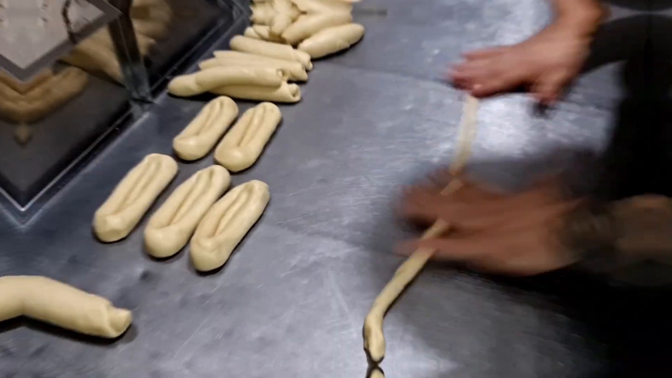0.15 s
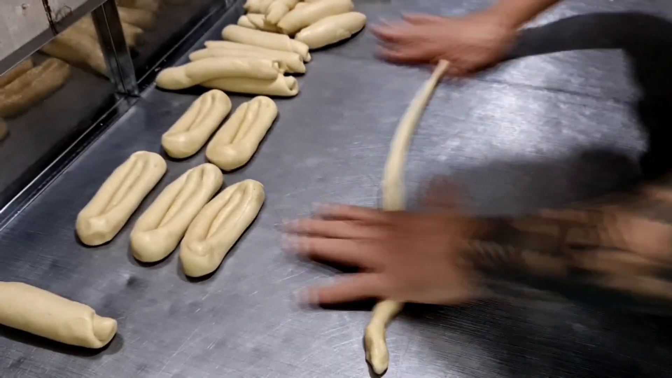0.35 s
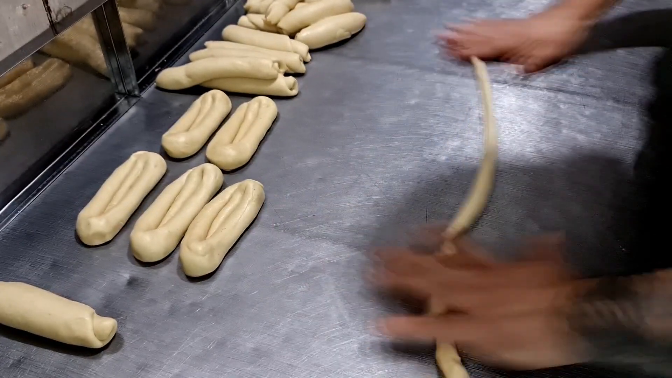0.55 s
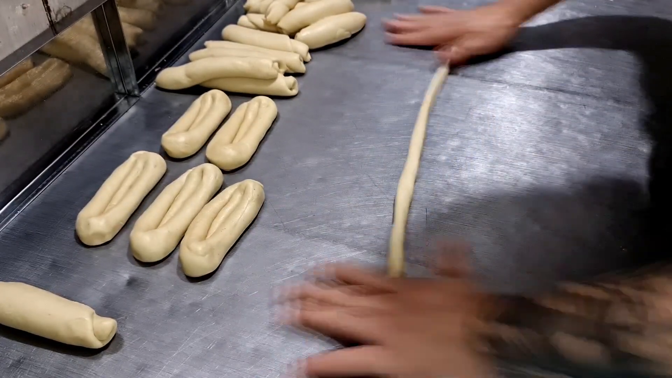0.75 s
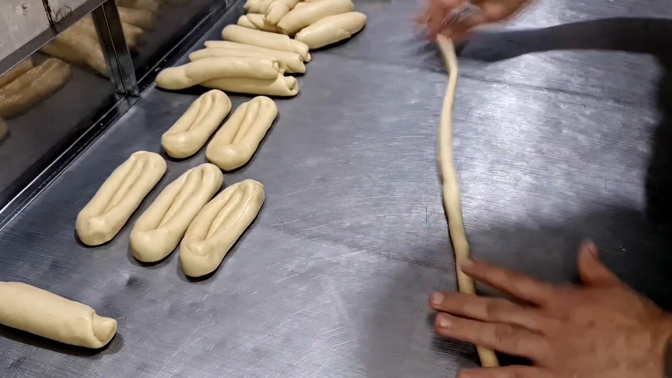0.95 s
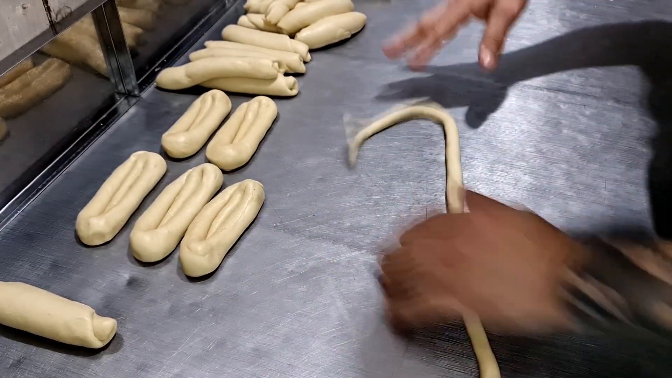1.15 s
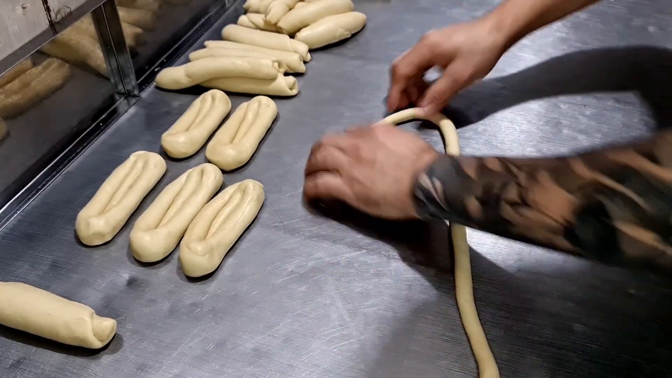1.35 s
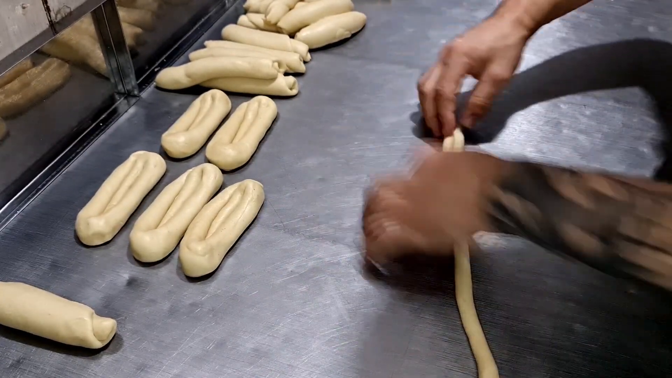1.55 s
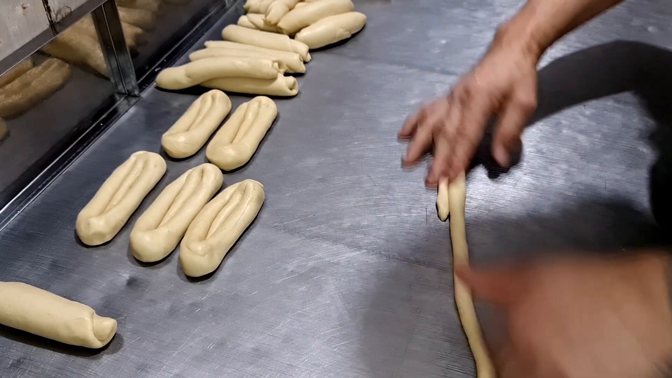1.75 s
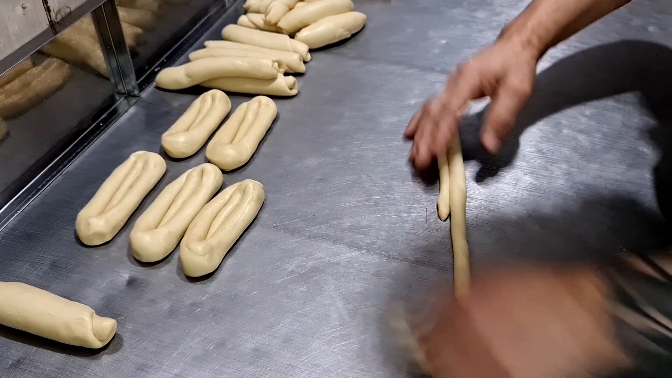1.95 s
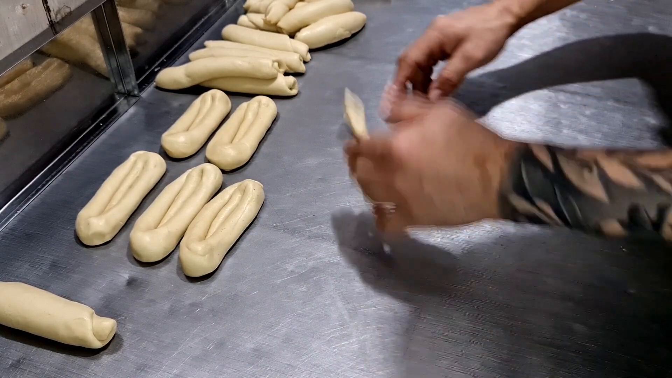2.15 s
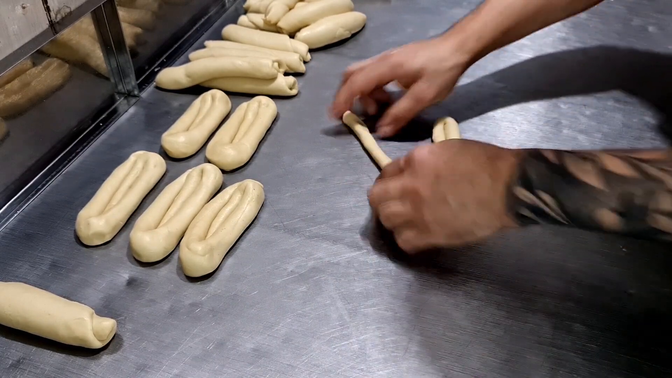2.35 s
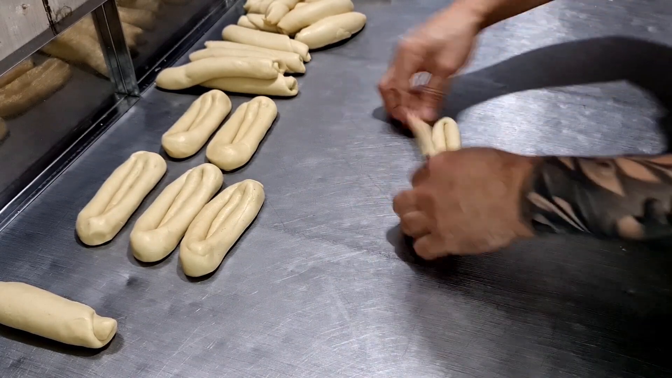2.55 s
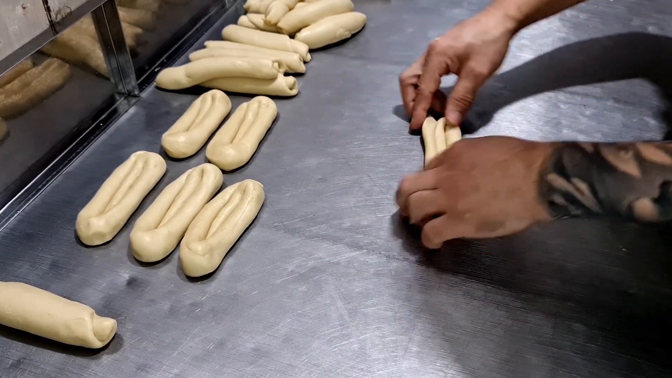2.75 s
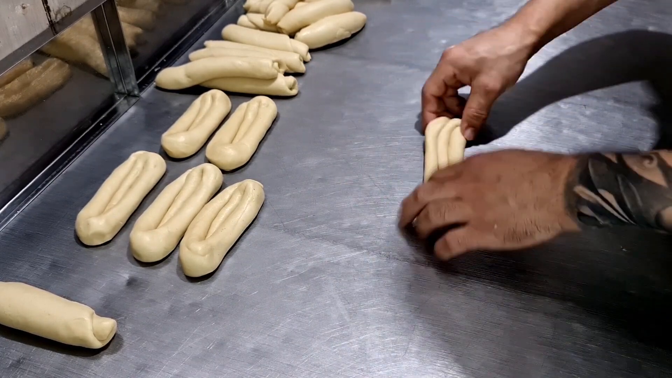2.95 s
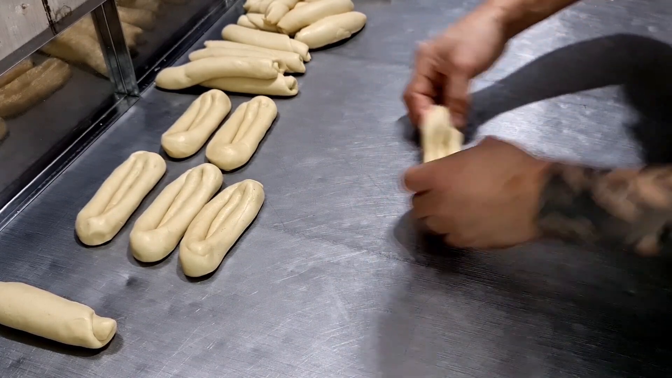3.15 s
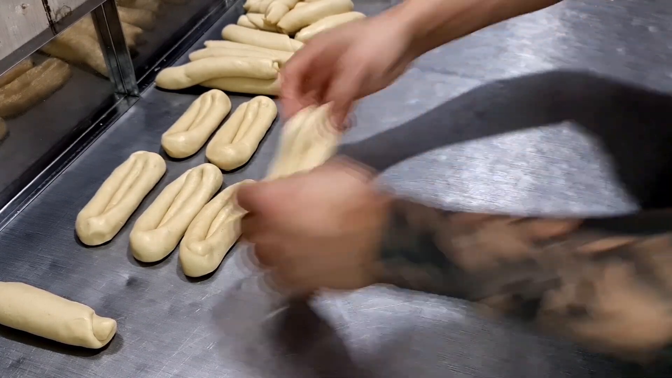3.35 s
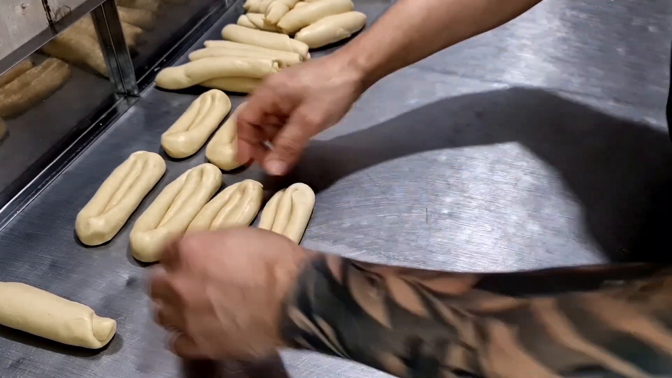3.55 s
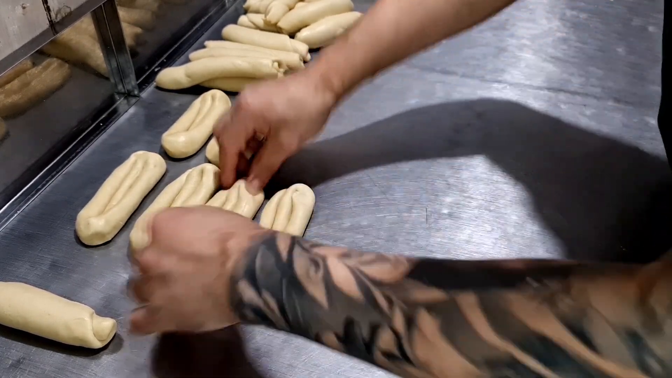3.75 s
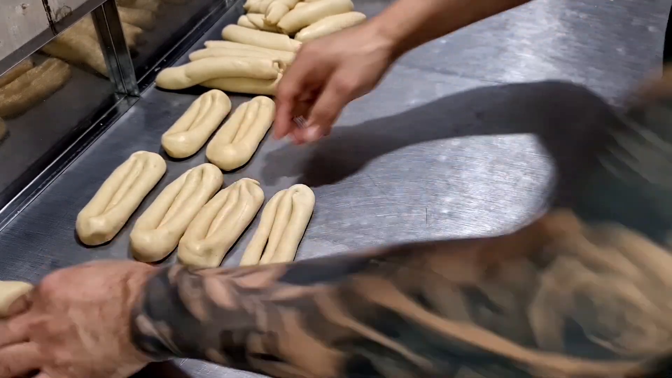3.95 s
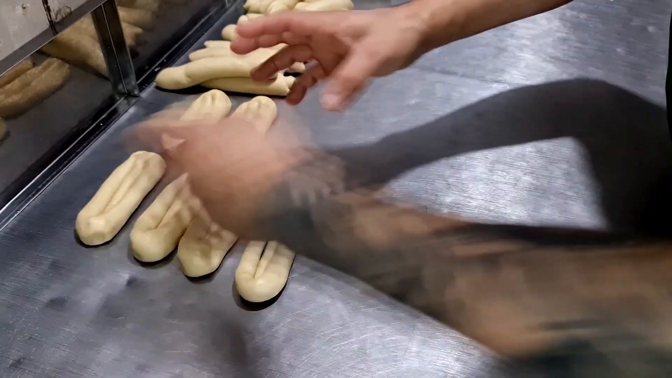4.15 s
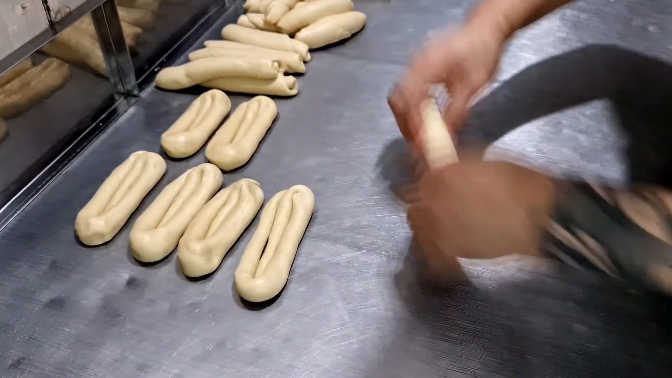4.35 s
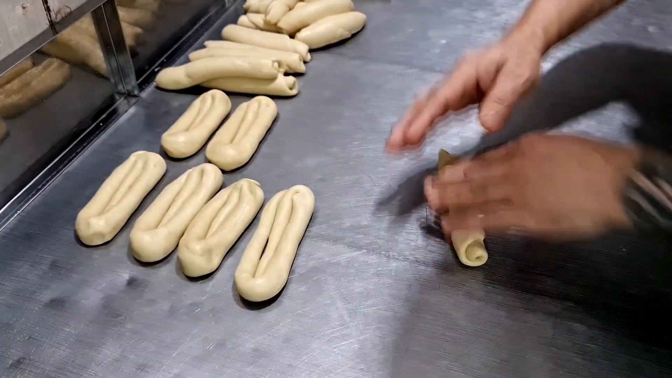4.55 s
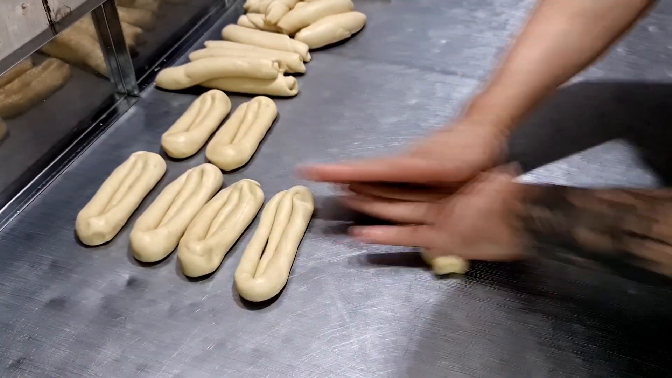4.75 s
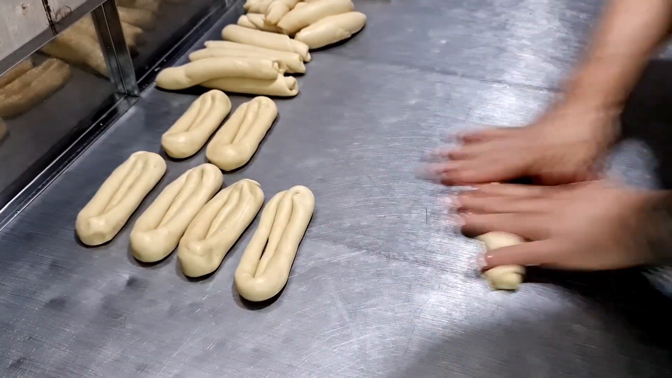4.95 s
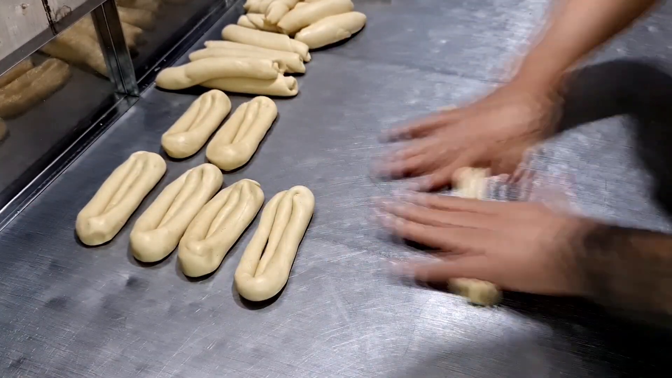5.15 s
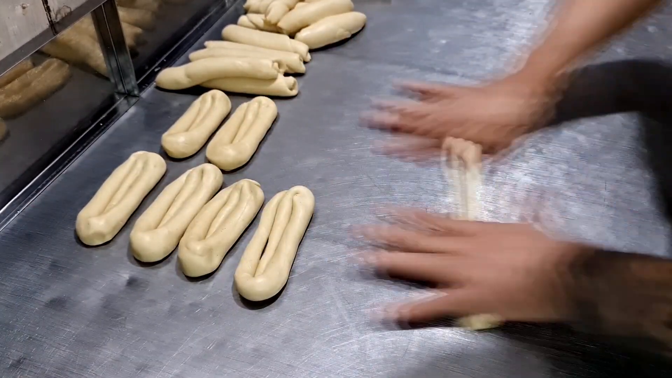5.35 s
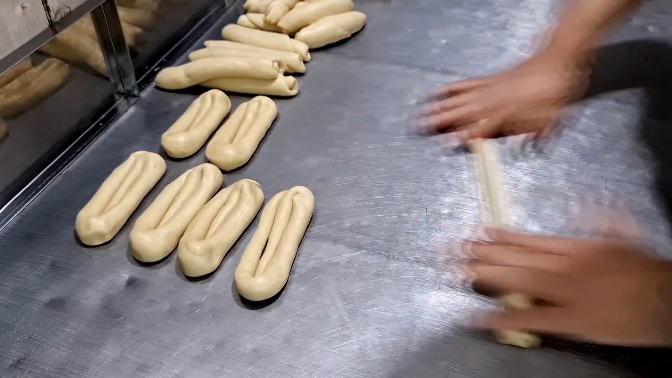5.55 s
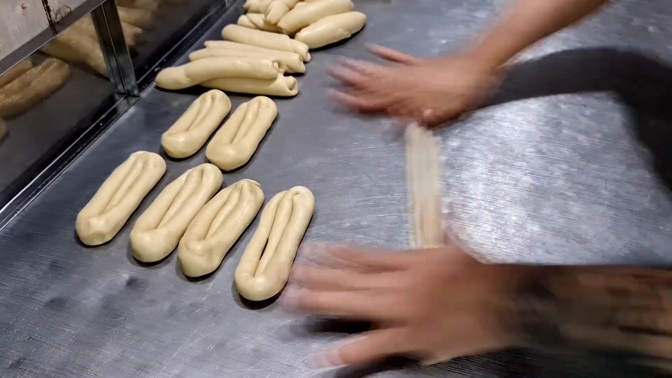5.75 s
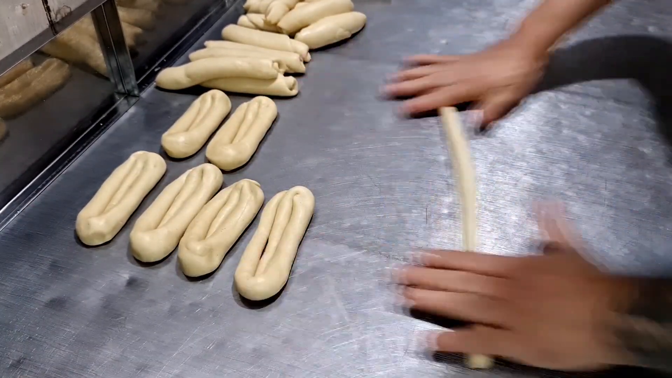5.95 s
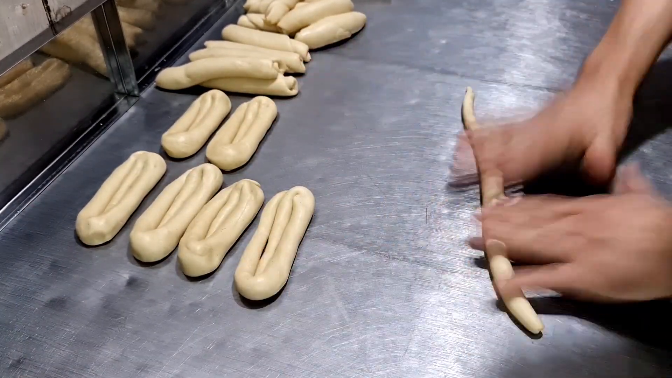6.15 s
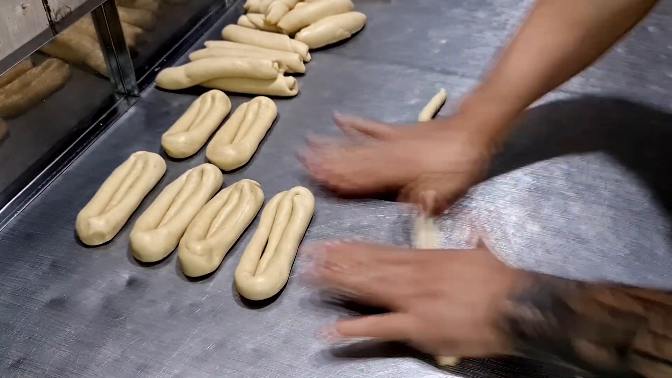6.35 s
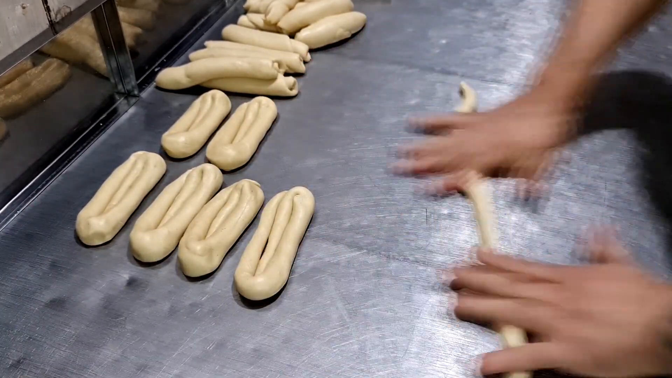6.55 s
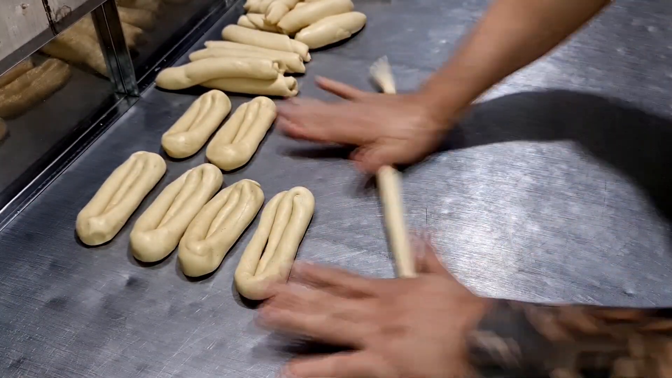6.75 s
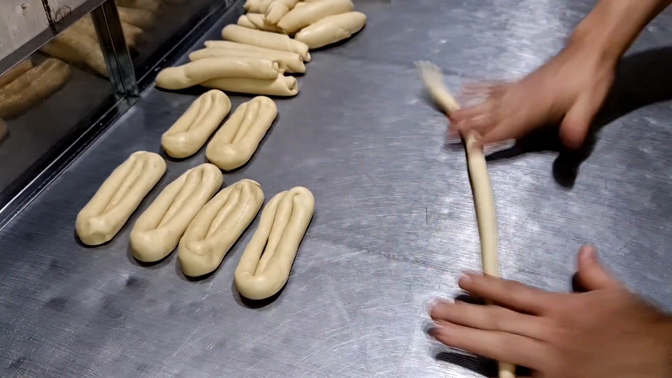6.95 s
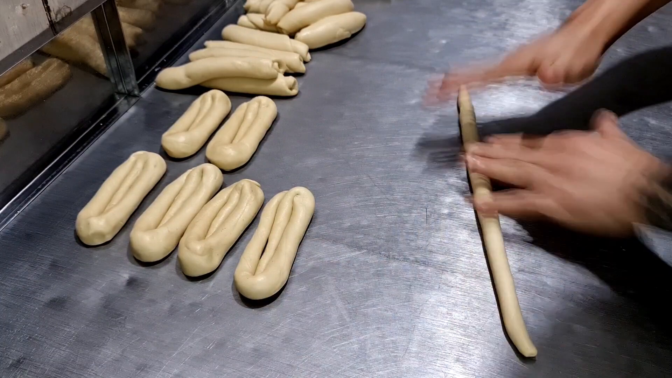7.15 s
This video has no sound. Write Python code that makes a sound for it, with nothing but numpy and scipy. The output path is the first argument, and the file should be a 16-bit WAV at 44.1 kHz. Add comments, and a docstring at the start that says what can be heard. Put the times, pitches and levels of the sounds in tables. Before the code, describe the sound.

Hands roll dough ropes on a hollow steel bench with soft quick rubbing, broken by dull knocks and one loud slap, over a cooler's hum.

```python
"""A baker rolls ropes of dough under both palms on a steel bench, and dough or a flat palm slaps down.
Each blow rings the hollow bench top: a low boom, a knock and a clang, with a smack of squeezed air.
Rolling patters softly on the same bench; dough and skin hiss over the steel as noise with tiny catches.
A small hard kitchen adds fading echoes, and a cooler rushes and hums in the background."""
import sys
import numpy as np
from scipy import signal
from scipy.fft import rfft, irfft, next_fast_len
from scipy.io import wavfile
from scipy.ndimage import map_coordinates

SR = 44100
rng = np.random.default_rng(int(sys.argv[2]) if len(sys.argv) > 2 else 0)


def wav_out(sig):
    """Save sig, one row per channel (or a flat mono array), as 16-bit PCM at SR to the path in sys.argv[1]."""
    wavfile.write(sys.argv[1], SR, np.round(np.clip(np.atleast_2d(sig).T, -1, 1) * 32767).astype(np.int16))


N = 321354
TIME = np.arange(N) / SR  # the whole scene [s]
AFTER = np.arange(SR * 3 // 5) / SR  # time since one blow [s]

# Dough or a flat palm slaps the steel; all levels are relative, and each sound has a further overall level:
# (time [s], knock [dB], boom over the knock [dB], clang over its usual share [dB],
#  smack [dB], crack over the smack [dB])
SLAP_EVENTS = [(1.250, -23.5, -31, 2.5, -40, -6), (1.271, -26, -4.5, 3, -36, -24),
               (2.266, -24, -3, -8.5, -35, -13), (2.274, -34, -11, 8.5, -37, -18),
               (2.665, -37, 8, -12, -42.5, -12.5), (3.543, -20.5, 0, -3, -29, -4),
               (4.493, -38, 6, -8, -30, -19), (4.504, -18.5, 13, 10.5, -18.5, -19.5),
               (4.737, -57, 17, 1, -51, -20), (6.304, -49, 19, 6, -45, -4.5), (6.712, -40, 4, 10, -56, -4),
               (7.1, -43, 1.5, 10, -48.5, -22)]
# The palms roll the rope out and back, about five strokes a second; levels are relative:
# (fastest moment [s], rub [dB], bare skin over the rub [dB], weight on the bench [dB])
ROLL_STROKES = [(0.12, -53.5, -15, -47.5), (0.343, -57.5, -17, -51), (0.524, -53.5, -13.5, -48),
                (0.73, -54.5, -14, -51.5), (0.897, -57, -5.5, -53.5), (4.743, -59.5, -13, -58),
                (4.898, -60, -8, -55), (5.088, -57.5, -15, -51), (5.244, -54.5, -15, -51.5),
                (5.45, -55, -14, -46.5), (5.606, -50.5, -18, -50.5), (5.82, -53, -11.5, -49),
                (5.996, -53, -13, -46), (6.32, -56.5, -17.5, -55.5), (6.5, -55.5, -16, -48.5),
                (6.702, -55.5, -6.5, -56), (6.897, -54.5, -13.5, -53), (7.27, -65, -36, -78)]
# Frequency ranges of the bench's boom, knock, clang and plate, in that order: (from [Hz], to [Hz])
BENCH_REGISTERS = [(0, 115), (115, 290), (290, 440), (440, 1000)]


def amp(db):
    """Turn decibels into a gain."""
    return 10 ** (np.asarray(db) / 20)


def unit(x):
    """Scale a sound to rms 1."""
    return x / np.sqrt(np.mean(x ** 2) + 1e-20)


def unit_attack(x, size=2646):
    """Scale a sound to rms 1 over its first 60 ms."""
    return x / np.sqrt(np.mean(x[..., :size] ** 2) + 1e-20)


def along(points, hz):
    """Read a curve of (frequency [Hz], value) points on a log frequency axis."""
    f, v = np.transpose(points)
    return np.interp(np.log(hz + 1), np.log(f + 1), v)


def wobble(rate):
    """Draw a smooth random curve through `rate` random points a second."""
    knots = rng.standard_normal(int(N * rate / SR) + 4)
    return map_coordinates(knots, [TIME * rate])


def filtered(x, response):
    """Make each frequency of x louder or softer by the gain that response gives it."""
    n = x.shape[-1]
    m = next_fast_len(n + 8192)
    hz = np.fft.rfftfreq(m, 1 / SR)
    return irfft(rfft(x, m) * response(hz), m)[..., :n]


def half_angle(hz):
    """Half the phase between the two ears that gives their likeness at each frequency."""
    # How alike left and right are: (frequency [Hz], likeness from -1 to 1)
    likeness = [(100, 0.94), (200, 0.89), (380, 0.39), (700, -0.35), (1300, -0.5), (2400, -0.12),
                (8000, -0.038)]
    return np.arccos(np.clip(along(likeness, hz), -1, 1)) / 2


def noise(spectrum, size, grain=1):
    """Coloured stereo noise of rms 1, nearly the same in both ears in the bass and wider above."""
    white = rng.standard_normal((2, size)) * grain

    def color_and_spread(hz):
        angle = half_angle(hz)
        return amp(along(spectrum, hz)) * [np.cos(angle), np.sin(angle)]

    mid, side = filtered(white, color_and_spread)
    return unit(np.array([mid + side, mid - side]))


def dying(t60):
    """A ring loses energy at a constant rate: a decay of 60 dB in t60 seconds."""
    return np.exp(-np.log(1000) * AFTER / t60)


def rising(seconds):
    """A soft contact builds up its force smoothly."""
    return 1 - np.exp(-(AFTER / seconds) ** 2)


def add(track, s, sound):
    """Mix a sound into the track at s seconds."""
    start = max(round(s * SR), 0)
    track[:, start:start + sound.shape[1]] += sound[:, :N - start]


def cooler(air_db=-53.0, waver_db=-2.5, drift=0.46):
    """A fan's steady rush is noise; its motor hums in lines that waver in level and phase."""
    # Colour of the rushing air: (frequency [Hz], relative level [dB])
    air_color = [(12, -49), (27, 7.5), (46, -0.5), (72, 5.5), (105, -1.5), (150, -8.5), (260, -12.5),
                 (370, -5), (470, -14), (720, -11.5), (1050, -17.5), (1700, -19.5), (2000, -26),
                 (3000, -26), (4500, -34), (6800, -35), (9500, -48), (15000, -44)]
    # Lines of the motor: (frequency [Hz], rms level around which it wavers [dB])
    motor_lines = [(64.6, -81.5), (120, -64), (204, -61.5), (403.7, -77.5), (602.9, -76.5), (845.2, -79.5),
                   (1701, -87)]
    hum = 0
    for hz, db in motor_lines:
        level = amp(db + waver_db * wobble(12))
        phase = 2 * np.pi * hz * TIME + drift * wobble(3.8)
        hum = hum + level * np.sqrt(2) * np.sin(phase)
    return hum + amp(air_db) * noise(air_color, N)


def walls(x, count=10, echo=0.21, reach=0.022):
    """Splash-back, tiles and ceiling send each ear a few weak early copies within reach [s]."""
    out = x.copy()
    for delay, ear in zip(rng.uniform(.002, reach, count), np.arange(count) % 2):
        add(out[ear:ear + 1], delay, echo * x[ear:ear + 1])
    return out


def burst(spectrum, direct, direct_t60):
    """A short direct burst and its echoes, each frequency dying at the kitchen's pace."""
    # How long echoes last in the kitchen: (frequency [Hz], time to fall by 60 dB [s])
    echo_times = [(200, 0.32), (1400, 0.2), (5000, 0.27), (14000, 0.15)]
    hz, t, z = signal.stft(noise(spectrum, len(AFTER)), SR, nperseg=256)
    z = z * np.exp(-np.log(1000) * t / along(echo_times, hz)[:, None])
    tail = signal.istft(z, SR, nperseg=256)[1][:, :len(AFTER)]
    return unit_attack(tail * (1 + direct * dying(direct_t60)))


def steel(x, width_hz=35):
    """The thin sheet colours whatever rubs or smacks on it with narrow peaks and dips."""
    # Where the sheet radiates more or less strongly: (frequency [Hz], boost [dB])
    sheet_peaks = [(1060, -4), (1227, 2.5), (1535, 3), (1669, 1.5), (2469, 2), (2638, -2.5)]

    def peaks(hz):
        return amp(sum(db / (1 + ((hz - centre) / width_hz) ** 2) for centre, db in sheet_peaks))

    return filtered(x, peaks)


def ring(register, rise, scatter_db=0.37):
    """The bench rings in one register as fading sines, weighted anew for each spot struck."""
    # Ringing tones (modes) of the bench top: (frequency [Hz], relative level [dB], time to fall by 60 dB [s])
    bench_modes = [(40.8, -15.5, 0.95), (51.7, -15, 0.75), (63.83, 2, 0.3), (83, -4, 0.19),
                   (95.4, -4.5, 0.43), (131.3, -1, 0.18), (149.2, 7.5, 0.19), (177.8, -4.5, 0.31),
                   (197.4, 1, 0.12), (237.2, -9, 0.41), (254.6, -3.5, 0.15), (331.9, -5, 0.2),
                   (367.5, -5, 0.19), (397.1, -7, 0.14), (486.4, 0.5, 0.11), (504.2, -11.5, 0.27),
                   (525, 3, 0.061), (646, -9, 0.24), (722, -10, 0.25)]
    lo, hi = register
    out = 0
    for hz, db, t60 in bench_modes:
        if lo <= hz < hi:
            phase = rng.uniform(0, 2 * np.pi) + half_angle(hz) * np.array([[1], [-1]])
            gain = amp(db + scatter_db * rng.normal())
            out = out + gain * dying(t60) * np.sin(2 * np.pi * hz * AFTER + phase)
    return unit_attack(out * rising(rise))


def speed(s, swell, fade, bluntness=1.78):
    """A hand speeds up until s and slows down again."""
    return np.exp(-np.abs((TIME - s) / np.where(TIME < s, swell, fade)) ** bluntness)


def friction(brush_db=-1):
    """Gains of dough rub, brush and skin hiss, all following the speed of the hand or dough."""
    # Dough is dragged or a hand skids over the bare steel; levels are relative:
    # (fastest moment [s], swell [s], rub [dB], brush over the rub [dB], bare skin over the rub [dB])
    slide_moves = [(0.01, 0.0058, -45.5, -5, -10), (1.425, 0.038, -56.5, -8.5, -13.5),
                   (1.648, 0.02, -61, -11, -17), (1.859, .036, -73, 3, 0), (1.979, 0.037, -59, -2.5, -11),
                   (2.46, 0.05, -56.5, -12, -20), (2.494, 0.017, -62.5, 7.5, -16),
                   (3.099, .045, -45.5, -8, -22), (3.22, 0.038, -59.5, -7.5, -17),
                   (4.088, 0.048, -54, -9, -17), (5.787, 0.023, -53.5, -0.5, -3.5)]
    roll_swell_s, roll_fade_s = .045, 0.11  # every rolling stroke swells and fades alike
    slide_fade = 1.64  # a slide takes this many times longer to fade than to swell
    moves = []
    for s, db, skin, weight in ROLL_STROKES:
        brush = skin / 2 + brush_db  # about halfway between rub and skin
        moves.append((speed(s, roll_swell_s, roll_fade_s), db, brush, skin))
    for s, swell, db, brush, skin in slide_moves:
        moves.append((speed(s, swell, slide_fade * swell), db, brush, skin))
    # strokes that overlap add up in power
    power = sum((amp([[db], [db + brush], [db + skin]]) * pace) ** 2 for pace, db, brush, skin in moves)
    return np.sqrt(power)


def strokes(motion, rub_db=-1, brush_db=0, skin_db=1.5):
    """Dough and skin slide over the steel in countless tiny catches that roughen the noise."""
    # Colours of dough rub, brush and bare skin: (frequency [Hz], relative level [dB])
    rub_color = [(150, -11), (400, 3.5), (700, 8.5), (1000, 3), (1600, 3.5), (2100, -1.5), (2900, -1.5),
                 (4000, -12.5), (8000, -38)]
    brush_color = [(2500, 3), (4000, 5), (5500, 5), (7000, 3.5), (8700, -7), (10500, -17), (15000, -28)]
    skin_color = [(6000, -27), (8600, -5), (9800, -9), (11500, -3), (13000, -3), (15200, -4.5)]
    catches = unit(amp(2.2 * wobble(1200) + 1.1 * wobble(80)))
    parts = zip(motion, (rub_db, brush_db, skin_db), (rub_color, brush_color, skin_color))
    return sum(amp(db) * gain * noise(spectrum, N, catches) for gain, db, spectrum in parts)


def rolling(rate=110, levels_db=(5, 0, -5, -9), lump_db=3):
    """Lumps of the rope and ridges of the fingers patter on the bench, about `rate` a second, with each push."""
    # the patter trails the hand's speed and lasts longer than the rub
    lag_s, swell_s, fade_s = 0.003, 0.037, 0.12
    power = sum((amp(weight) * speed(s + lag_s, swell_s, fade_s)) ** 2 for s, db, skin, weight in ROLL_STROKES)
    push = np.sqrt(power)
    touches = rng.random(N) < rate / SR
    lumps = unit(touches * amp(lump_db * rng.standard_normal(N))) * push
    soft_contact_s = .005
    body = sum(amp(db) * unit(ring(register, soft_contact_s))
               for register, db in zip(BENCH_REGISTERS, levels_db))
    # every lump sets off the bench's ring
    return signal.fftconvolve(lumps[None], body / np.sqrt(len(AFTER)), axes=1)[:, :N]


def blows():
    """List every weight on the bench: (time [s], knock [dB], boom [dB], extra clang [dB], slowness)."""
    # A hand leans on the dough, or its loose end flops down; levels are relative:
    # (time [s], knock [dB], boom over the knock [dB])
    press_events = [(0.005, -38, -4), (0.184, -44.5, -20), (0.352, -32.5, -0.5), (0.545, -35.5, 2.5),
                    (0.605, -38, 5), (1.402, -39, 11.5), (1.903, -38.5, 3.5), (2.499, -46, 7.5),
                    (2.646, -39.5, 4), (2.996, -47, 5.5), (3.257, -41, -2), (3.749, -45, 12),
                    (4.055, -42, 17), (4.105, -37.5, 11.5), (4.55, -20, -14), (5.442, -29, 5.5),
                    (5.605, -38, 11), (5.638, -40.5, 14.5), (5.82, -43, 12.5), (5.856, -35.5, -3),
                    (5.883, -34.5, -2), (6.014, -42, 5), (6.287, -47.5, 21.5)]
    weight_lag_s = .0018  # the weight of a slap arrives just after its smack
    # a press stirs the thin sheet by a set amount, and its force builds this many times more slowly
    press_clang_db, press_slowness = -0.5, 1.3
    slapped = [(s + weight_lag_s, db, boom, clang, 1) for s, db, boom, clang, smack, crack in SLAP_EVENTS]
    pressed = [(s, db, boom, press_clang_db, press_slowness) for s, db, boom in press_events]
    return slapped + pressed


def thumps(boom_db=-8, knock_db=-7.5, clang_db=-17.0, plate_db=-26, blur_db=0,
           rises=(.008, .003, .003, .002), sag=0.0058):
    """Soft weight lands: the whole top heaves slowly, its panels knock, the thin sheet clangs."""
    # Colour of the sheet's many weak modes: (frequency [Hz], relative level [dB])
    plate_color = [(380, -30), (490, 0), (550, 0), (660, -11), (1300, -19), (2800, -45)]
    plate_growth = 1.25  # the sheet's highest modes change by this many dB per dB of extra clang
    out = np.zeros((2, N))
    for s, db, boom, clang, slowness in blows():
        levels = boom + boom_db, knock_db, clang + clang_db, plate_growth * clang + plate_db
        starts = s - sag, s, s, s  # the top begins to give before the full weight arrives
        for register, start, level, rise in zip(BENCH_REGISTERS, starts, levels, rises):
            add(out, start, amp(db + level) * ring(register, rise * slowness))
        # between the strong modes lie many weak ones that blur together
        blur = burst(plate_color, direct=0.51, direct_t60=0.14) * rising(rises[-1] * slowness)
        add(out, s, amp(db + levels[-1] + blur_db) * blur)
    return out


def slaps(smack_db=-11, crack_db=-10, smack_rise=0.0004, crack_rise=0.00098):
    """Air squeezed from under the dough smacks, with a brief crack at first touch."""
    # Colours of the smack and the crack: (frequency [Hz], relative level [dB])
    smack_color = [(300, -1), (700, 0), (1050, -3), (1400, 0.5), (1750, -3), (2000, -11.5), (2800, -9.5),
                   (3600, -22.5), (6000, -28.5), (10000, -39)]
    crack_color = [(1500, -5), (3200, 3.5), (4500, -3), (6300, -4.5), (8000, -18), (10000, -33),
                   (13000, -22), (15500, -39)]
    out = np.zeros((2, N))
    for s, *_, db, crack in SLAP_EVENTS:
        smack_sound = burst(smack_color, direct=0.48, direct_t60=0.17) * rising(smack_rise)
        add(out, s, amp(db + smack_db) * smack_sound)
        crack_sound = burst(crack_color, direct=3, direct_t60=0.016) * rising(crack_rise)
        add(out, s, amp(db + crack + crack_db) * crack_sound)
    return out


def scene(hands_pan_db=0.56):
    """Mix the bench and the hands, both a little to the right of centre, with the cooler."""
    # How far the bench leans to the right: (frequency [Hz], gain right and loss left [dB])
    bench_lean = [(170, 0), (350, 4.5), (600, 1.5)]
    rightward = np.array([[-1], [1]])
    bench = filtered(thumps() + rolling(), lambda hz: amp(along(bench_lean, hz) * rightward))
    hands = walls(steel(slaps() + strokes(friction()))) * amp(hands_pan_db * rightward)
    return bench + hands + cooler()


def record(dry):
    """Cut off everything from 15600 Hz upward."""
    top_hz = 15600
    return filtered(dry, lambda hz: hz < top_hz)


dry = scene()
out = record(dry)
wav_out(out)
```